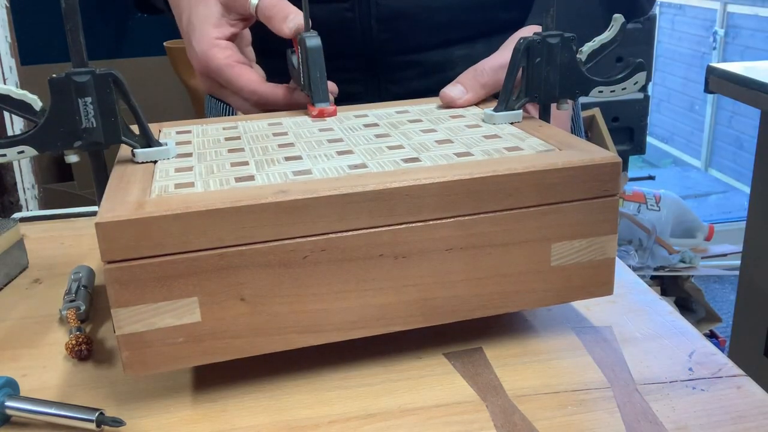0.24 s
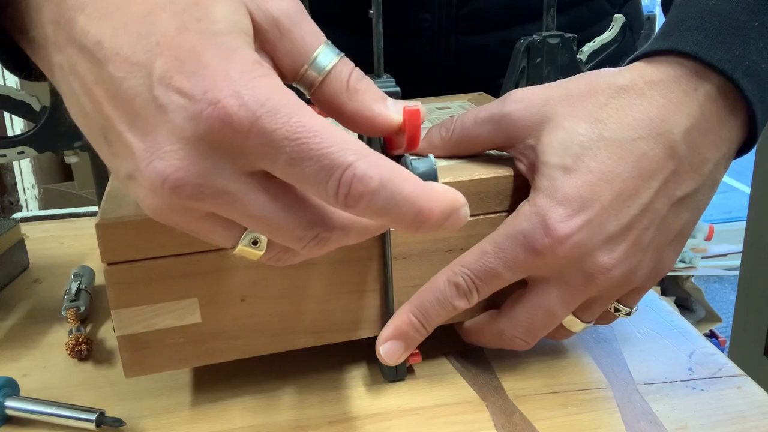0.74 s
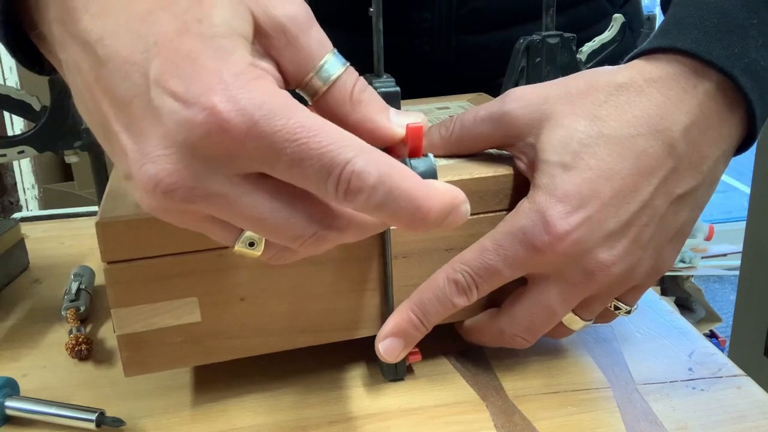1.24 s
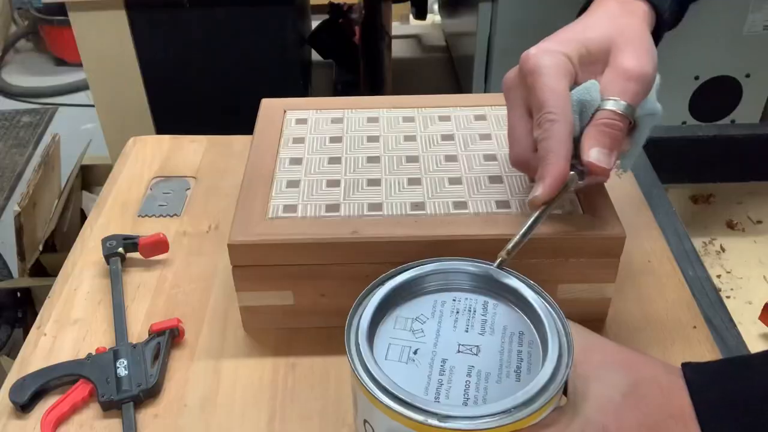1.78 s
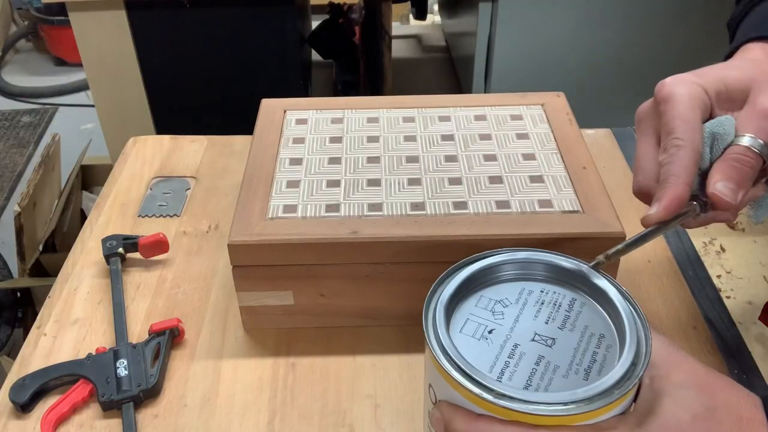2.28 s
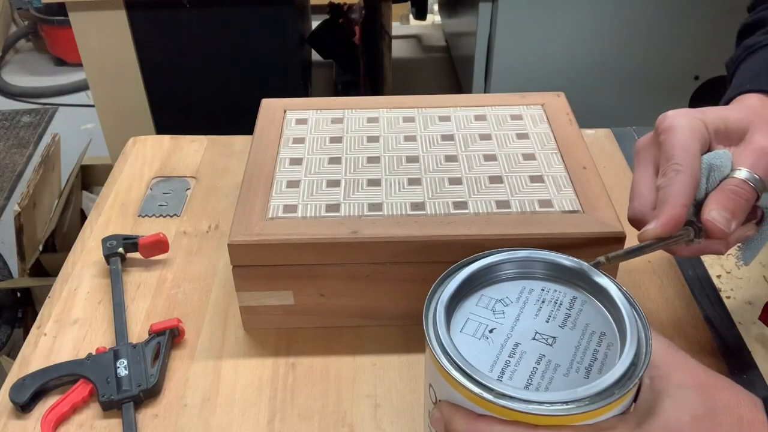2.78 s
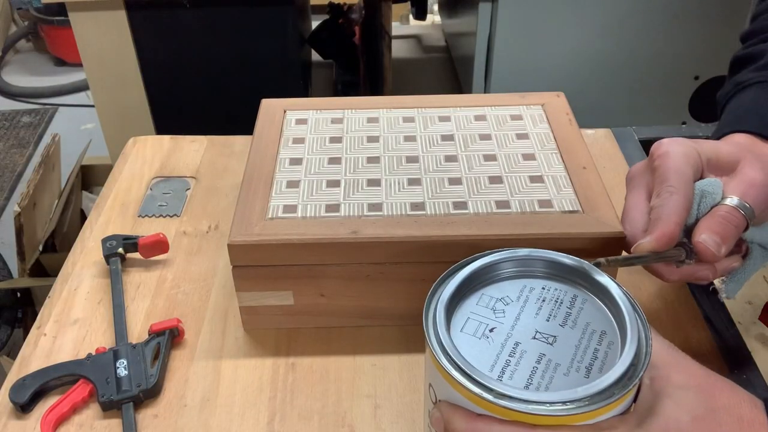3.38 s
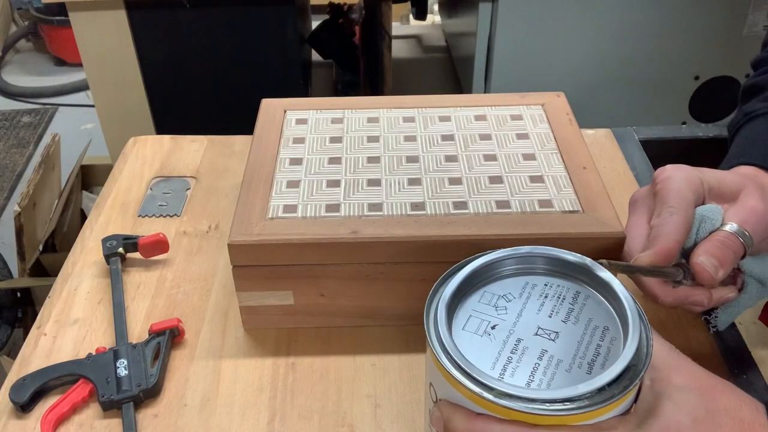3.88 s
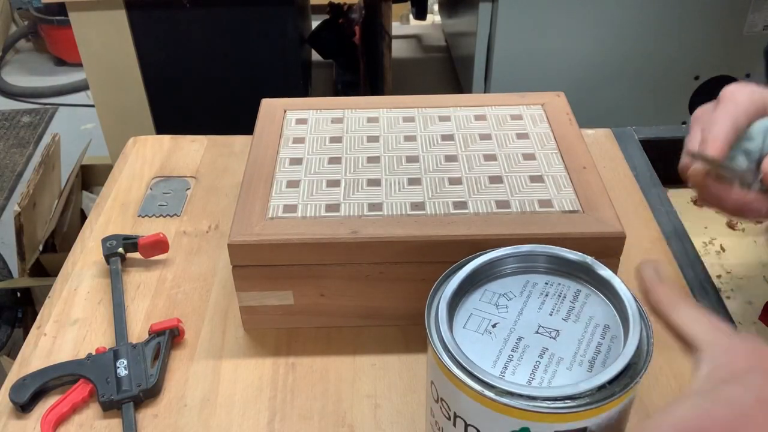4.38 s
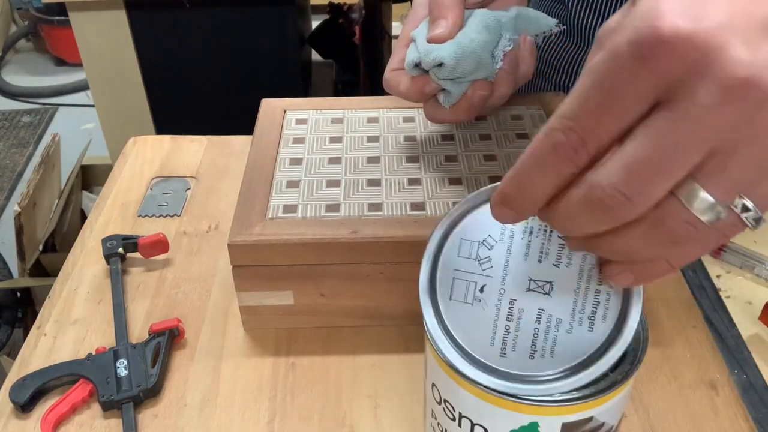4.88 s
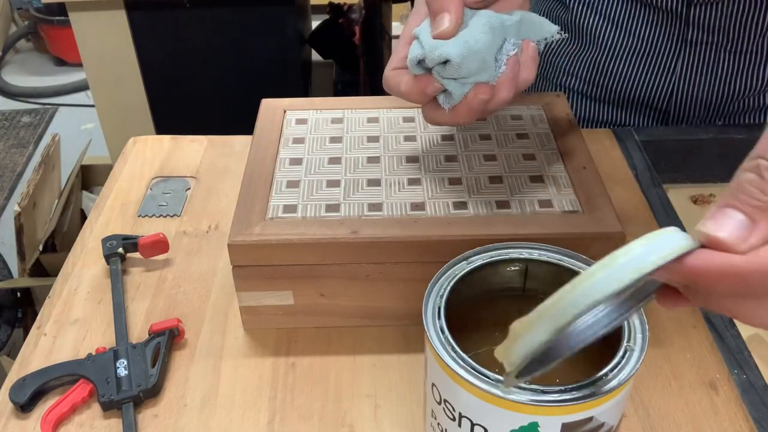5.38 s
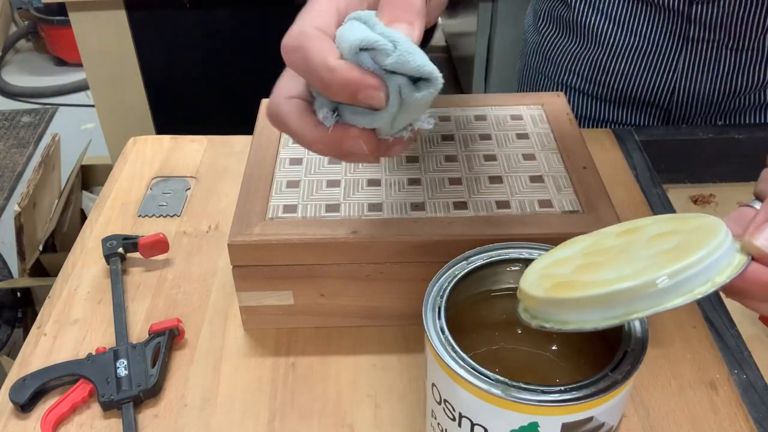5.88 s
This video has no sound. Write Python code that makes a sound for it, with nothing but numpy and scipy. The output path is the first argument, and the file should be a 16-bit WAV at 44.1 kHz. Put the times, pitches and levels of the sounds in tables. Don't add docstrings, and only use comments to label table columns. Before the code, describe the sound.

Soft hollow wooden box knocks and rubs in a quiet workshop, then a fan hiss begins and a tin lid is levered up in five loud ringing pops.

```python
import sys
import numpy as np
from scipy import signal
from scipy.fft import rfft, irfft
from scipy.io import wavfile
from scipy.ndimage import uniform_filter1d

SR = 44100
rng = np.random.default_rng(int(sys.argv[2]) if len(sys.argv) > 2 else 0)


def pcm_store(signal):
    levels = np.round(np.clip(np.atleast_2d(signal), -1, 1) * 32767)
    wavfile.write(sys.argv[1], SR, levels.astype(np.int16).T)


def to_linear_factor(level_db):
    exponent = np.asarray(level_db, float) / 20
    return 10 ** exponent


N = 270333
T = np.arange(N) / SR
HZ = np.maximum(np.fft.rfftfreq(N, 1 / SR), 1)

CHANGES_S = (1.781, 4.577)
# start in seconds, peak in dB, lid ring in Hz, lid body in dB, bench thud in dB.
LID_POPS = [
    (2.2178, -3.5, 700.3, -13.5, -13),
    (2.6583, -8, 709.5, -7.5, -3),
    (2.948, -7.5, 731, -11.5, -15),
    (3.25, -6.5, 730, -29, -7.5),
    (3.481, -4, 723.5, -14.5, -6.5),
]


def on_hz(table):
    hz, value = np.transpose(table)
    return np.interp(np.log(HZ), np.log(np.maximum(hz, 1)), value)


def on_time(table):
    return np.interp(T, *np.transpose(table))


def unit(x):
    return x / np.sqrt(np.mean(x ** 2))


def band(x, lo_hz, hi_hz):
    return signal.sosfilt(signal.butter(2, [lo_hz, min(hi_hz, 20000)], "band", fs=SR, output="sos"), x)


def walk(rate):
    k = int(SR / rate)
    steps = np.repeat(rng.standard_normal(N // k + 1), k)
    return 1.82 * uniform_filter1d(uniform_filter1d(steps, k), k)[:N]


def add(out, s, x):
    i = int(s * SR)
    out[i:i + len(x)] += x[:N - i]


def ring(modes, db, scale=1., push_ms=.3, scatter_db=2.5, split=0.0038, jitter=0.0083, sag=0.):
    hz, mode_db, t60 = np.array(modes).T[:, :, None]
    chance = rng.standard_normal((3, len(modes), 1))
    t = T[:SR // 2]
    sag_ms = 5.7
    settled_s = t - sag * sag_ms / 1000 * np.expm1(-t * 1000 / sag_ms)
    turn = 2 * np.pi * hz * scale * (1 + jitter * chance[0]) * settled_s
    pair = np.sin(turn) + np.sin(turn * (1 + split * chance[2]))
    waves = pair * np.exp(-np.log(1000) * t / t60)
    x = np.sum(to_linear_factor(mode_db + scatter_db * chance[1]) * waves, axis=0)
    x = x * -np.expm1(-t * 1000 / push_ms)
    return to_linear_factor(db) * x / np.abs(x).max()


def crack(db, lo_hz, hi_hz, ms):
    t = T[:SR // 4]
    x = band(rng.standard_normal(len(t)) * np.exp(-t * 1000 / ms), lo_hz, hi_hz)
    return to_linear_factor(db) * x / np.abs(x).max()


def stroke(t, peak_s, rise_s, fall_s):
    away = np.where(t < peak_s, (peak_s - t) / rise_s, (t - peak_s) / fall_s)
    return -29.5 * away ** 1.11


def air(spectrum, db, flicker_db):
    # frequency in Hz, left-right correlation.
    likeness = [(60, 0.8), (130, 0.52), (290, -0.021), (640, -0.5), (1410, -0.15), (3100, 0.28),
                (6820, -0.44), (15000, 0.28)]
    like = np.clip(on_hz(likeness), -.95, .95)
    noise = rfft(rng.standard_normal((2, N)))
    mid, side = noise * to_linear_factor(on_hz(spectrum)) * np.sqrt([1 + like, 1 - like])
    out = 0
    for octave in range(4, 15):
        share = np.clip(1 - np.abs(np.log2(HZ) - octave), 0, 1)
        flicker = to_linear_factor(flicker_db * min(8 / octave, 1) ** 4 * walk(14))
        out = out + flicker * irfft(share * np.array([mid + side, mid - side]), N)
    return to_linear_factor(db) * out / np.sqrt(np.mean(out.mean(axis=0) ** 2))


def quiet_room():
    # frequency in Hz, level in dB per Hz.
    spectrum = [(15, -35), (25, 6.5), (313, -11), (648, -18.5), (970, -20.5), (1410, -18.5), (1530, -26),
                (3630, -25.5), (7300, -27.5), (8130, -25), (9550, -26.5), (12200, -25), (15500, -32)]
    return air(spectrum, -75.6, flicker_db=3.0) * (T < CHANGES_S[0])


def rubs():
    scrapes = {"palm": [(.108, 0.08, 0.041, -71, -93), (.178, 0.16, 0.11, -72, -75),
               (.794, .03, 0.052, -78.5, -78)], "box": [(1.385, 0.03, 0.027, -61.5, -76),
               (1.445, 0.039, 0.16, -64.5, -67), (1.6, 0.19, 0.29, -74, -71),
               (1.76, 0.19, 0.042, -72, -75)], "tin": [(1.9, 0.115, .12, -68, -66.5),
               (1.96, 0.071, .16, -64.5, -65), (2.03, 0.056, 0.086, -70.5, -74)],
               "blade": [(3.672, 0.0081, 0.087, -73, -64), (3.74, 0.022, 0.11, -60.5, -48.5),
               (3.782, 0.09, 0.026, -46, -35.5), (3.83, .05, 0.061, -75, -78)],
               "rim": [(4.2, .02, 0.11, -74, -80), (4.27, .02, .04, -66, -71),
               (4.288, 0.059, 0.047, -66, -56.5), (4.62, 0.022, 0.016, -54.5, -74),
               (4.64, 0.022, 0.056, -64.5, -67.5)], "lid": [(5.04, 0.1, 0.23, -67, -87),
               (5.1, 0.044, .08, -83, -90)]}
    drags = {"palm": [(.005, 0.0089, 0.07, -55, -76), (.12, 0.12, 0.07, -62, -58),
             (.17, 0.14, 0.032, -49, -73), (.3, 0.17, 0.023, -68, -81)],
             "box": [(1.45, 0.054, 0.063, -45, -49.5), (1.505, 0.052, 0.048, -45.5, -71.5)],
             "tin": [(1.92, 0.14, 0.36, -33.5, -45.5), (2.02, 0.17, 0.15, -40.5, -55.5)],
             "blade": [(3.75, 0.048, 0.085, -73, -41.5), (3.79, 0.07, 0.043, -36, -44),
             (3.87, 0.096, 0.066, -51.5, -70)], "rim": [(4.204, 0.0086, 0.05, -70, -44.5),
             (4.288, 0.087, 0.33, -54, -57.5), (4.62, 0.016, 0.013, -70, -61.5)],
             "lid": [(5.03, 0.034, 0.44, -68, -53)]}
    scrape_tones = {"palm": (3140, 1.3, 12300, 0.93), "box": (3350, 1.3, 9800, 0.6),
                    "tin": (2800, 1.1, 14160, .15), "blade": (3430, 5.7, 11500, 3.2),
                    "rim": (3960, 1.7, 13000, 1.9), "lid": (4600, 0.39, 12200, .6)}
    drag_tones = {"palm": (99, 1570, 0), "box": (140, 340, 0), "tin": (87.8, 1830, 1.6),
                  "blade": (237, 2240, 0), "rim": (199, 1770, 0), "lid": (150, 1000, 0)}
    slide_hz = (713, 1043, 1274, 1562)
    out = np.zeros(N)
    grain = rng.standard_normal((2, N)) * to_linear_factor(1.2 * walk(150))
    slips = rng.standard_normal(N) * to_linear_factor(2.5 * walk(45))
    for name, (rasp_hz, rasp_broad, hiss_hz, hiss_broad) in scrape_tones.items():
        rumble_hz, body_hz, sing = drag_tones[name]
        times = [row[0] for row in scrapes[name] + drags[name]]
        now = slice(int(max(min(times) - .3, 0) * SR), int((max(times) + .4) * SR))
        coarse, fine, slip = grain[0, now], grain[1, now], slips[now]
        rasp = band(coarse, rasp_hz * 0.977, rasp_hz * 1.1) + rasp_broad * band(coarse, 1400, 5900)
        hiss = band(fine, hiss_hz * 0.87, hiss_hz) + hiss_broad * band(fine, 6300, 20300)
        rumble = band(slip, rumble_hz * 0.978, rumble_hz * 1.25)
        rumble = rumble + 0.66 * band(slip, rumble_hz * 1.6, rumble_hz * 2.0)
        walls = sum(band(coarse, hz * .96, hz * 1.04) for hz in slide_hz)
        body = band(coarse, body_hz * 0.12, body_hz * 1.15) + sing * walls
        for *shape, rasp_db, hiss_db in scrapes[name]:
            friction = to_linear_factor(rasp_db) * unit(rasp) + to_linear_factor(hiss_db - 0.5) * unit(hiss)
            out[now] += to_linear_factor(stroke(T[now], *shape)) * friction
        for *shape, rumble_db, body_db in drags[name]:
            shaking = to_linear_factor(rumble_db - 6.0) * unit(rumble) + to_linear_factor(body_db - 4.0) * unit(body)
            out[now] += to_linear_factor(stroke(T[now], *shape)) * shaking
    return out


def knocks():
    # start in seconds, peak in dB, body in Hz, side panel in dB, hardness in dB.
    blows = [(0.036, -54.5, 183, -10, -28), (0.09, -60, 290, 8.5, -16), (0.105, -51.5, 243, 9, -17),
             (0.136, -61, 105, -3, -14), (0.333, -51, 314, 9, -25), (0.34, -36.5, 184.6, -31, -14),
             (0.498, -45.5, 211, -24, -22), (0.6, -43, 175.6, -32, -50), (0.629, -59, 152, -22, -41),
             (0.749, -63, 177, -21, -24), (0.786, -57, 207, -15, -9), (1.065, -44.5, 190, -19.5, -39),
             (1.217, -55.5, 300, -29, -29), (1.331, -62.5, 198, -15, -23), (1.385, -26, 197, -4.5, -14.5),
             (1.42, -39.5, 152, -19, -37), (3.765, -33.5, 189, -3.5, -7), (0.372, -48, 150, -11, -23),
             (1.46, -48, 158, -4.5, -30), (3.797, -38, 169.4, -6.5, -6), (3.821, -46, 150, -3, -25)]
    # ratio to body pitch, level in dB, t60 in seconds.
    box = [(.6, -7.5, 0.11), (1.0, 6, 0.07), (1.4, -7, 0.069)]
    # frequency in Hz, level in dB, t60 in seconds.
    panel = [(334.6, -0.5, 0.13), (356.7, 8, 0.086), (424.3, -3, 0.14), (432.5, -10.5, 0.18)]
    wood = [(550, -2, .05), (673, 0, .07), (760, -3, .05), (926, -4, .035), (1200, -4, .025),
            (1400, -5, .025), (1700, -8, .02), (2480, -12, .015)]
    out = np.zeros(N)
    for s, db, body_hz, panel_db, hard_db in blows:
        add(out, s, ring(box, db + 0.089, body_hz, push_ms=25.0, split=0.034, scatter_db=1.0, sag=0.54))
        add(out, s, ring(panel, db + panel_db, push_ms=7.6, split=0.051, scatter_db=2.5))
        add(out, s + 0.0093, crack(db - 11.5, body_hz * 0.546, body_hz * 1.05, ms=38.0))
        add(out, s + 0.011, crack(db - 17.0, 55, 125, ms=52.0))
        add(out, s - .002, ring(wood, db + hard_db - .1, push_ms=3.0, scatter_db=3.0, split=0.04))
        add(out, s - .002, crack(db + hard_db - 12.5, 950, 3360, ms=19.0))
    return out


def ticks():
    # start in seconds, peak in dB, pitch in Hz, low part in dB, top part in dB.
    small_ticks = [(0.0836, -48.5, 5540, 0.5, -18), (0.1045, -38.5, 5270, -9.5, -21),
                   (0.3294, -51, 3450, 5, -13), (0.4797, -74.5, 3580, 9.5, -10),
                   (0.8003, -65, 3380, -17, -2), (0.9038, -68.5, 3470, -10, 2),
                   (1.3805, -49.5, 3940, 9.5, -10), (1.4424, -43.5, 4770, -15, -31),
                   (3.579, -52, 3200, 12, -20.5), (3.6708, -49, 6800, -10, -4), (3.726, -42, 6000, -6, 0),
                   (3.7485, -38, 3540, -4, 2), (4.2055, -44, 4900, 4, -2.5), (4.2244, -48, 5150, 2, -12),
                   (4.2617, -52, 4270, 1, 2), (4.2768, -48.5, 3360, -0.5, 3), (4.589, -54, 5140, -7, -8.5),
                   (4.5974, -58.5, 3470, -17, -5), (4.6187, -40.5, 5070, -1, 2.5)]
    # start in seconds, peak in dB, pitch in Hz.
    lid_ticks = [(4.8427, -58, 5120), (5.1647, -64, 4900), (5.5253, -75, 5180), (5.5653, -65, 5030)]
    out = np.zeros(N)
    for s, db, tick_hz, low_db, top_db in small_ticks:
        add(out, s, crack(db - 9.0, tick_hz * .96, tick_hz * 1.04, ms=2.2))
        add(out, s, crack(db - 8.5, 3200, 7600, ms=2.7))
        add(out, s, crack(db + low_db - 1, 600, 2000, ms=3.4))
        add(out, s, crack(db + top_db + 0.12, 7700, 15800, ms=2.1))
    for s, db, tick_hz in lid_ticks:
        add(out, s, crack(db - 3, tick_hz * .97, tick_hz * 1.03, ms=4.1))
        add(out, s, crack(db - 2, 3000, 6300, ms=2.4))
    return out


def fan():
    # frequency in Hz, level in dB per Hz.
    spectrum = [(15, -79), (25, -18), (91, -17), (160, -14.5), (188, -21), (240, -16), (389, -8.5),
                (445, -7.5), (582, -5.5), (1850, -17), (3630, -28), (7100, -48), (7910, -50.5),
                (14200, -48), (15000, -70)]
    # frequency in Hz, width in Hz, level in dB.
    resonances = [(197, 16.02, -71), (330.6, 69, -73), (1101.5, 110, -71), (1822, 160, -77.5)]
    # time in seconds, swell in dB.
    swells = [(1.78, 4), (2.2, 4), (4.4, 4.5), (4.6, 3), (6.13, 2.5)]
    # time in seconds, level in dB.
    hum_level = [(3.9, -77.5), (4.7, -76), (4.77, -67.5), (6.13, -65.5)]
    # peak in seconds, level in dB.
    surges = [(4.24, -52), (4.79, -52.5), (4.91, -55.5), (5.07, -55), (5.2, -58.5), (5.47, -55.5),
              (5.82, -56.5), (6.12, -59)]
    duct = 0
    for hz, width_hz, db in resonances:
        flutter = to_linear_factor(db + 2.4 * walk(9))
        duct = duct + flutter * unit(band(rng.standard_normal(N), hz - width_hz / 2, hz + width_hz / 2))
    gusts = sum(to_linear_factor(db + stroke(T, s, 0.072, 0.073)) for s, db in surges)
    hum = (to_linear_factor(on_time(hum_level)) + gusts) * unit(band(rng.standard_normal(N), 425, 468))
    hum = hum * to_linear_factor(-walk(20))
    fade_in = np.clip((T - CHANGES_S[0]) / .003, 0, 1)
    dip = np.clip(np.abs(T - CHANGES_S[1]) / 0.0034, .1, 1)
    hiss = air(spectrum, -60.5, flicker_db=2.5)
    return ((hiss + duct) * to_linear_factor(on_time(swells)) + hum) * fade_in * dip


def gripped(modes, low_db, high_db):
    grip_hz = (400, 1030, 3000, 3800)
    grip_db = (low_db, 0, 0, high_db)
    return [(hz, db + np.interp(hz, grip_hz, grip_db), t60) for hz, db, t60 in modes]


def pops():
    blade = [(-17, -7.5, -15, 5.5, -20.5), (-18.5, -24, -14.5, -10, -30), (-37.5, -36, 7, 0, -34.5),
             (-17.5, -23.5, -4, 1, -37.5), (-13.5, -26, 12, 3, -23)]
    # frequency in Hz, level in dB, t60 in seconds; rim, bench and boom alike.
    tin_modes = [(914, -6.5, 0.035), (1025, 1, 0.042), (1282, -9.5, 0.085), (1376, 2, 0.0158),
                 (1340, 2, 0.039), (1533, -12.5, 0.017), (1630, -9, 0.0693), (1530, -1, 0.013),
                 (2170, -52, .08)]
    rim_modes = [(2260, -1, .03), (2790, -2, .022), (3063, -2, .028), (3760, -4, .035), (4200, -8, .02),
                 (4900, -11, .015)]
    bench_modes = [(205.8, -24, 0.15), (253, -13.5, 0.059), (302, -12, 0.042), (361, -5.5, 0.035),
                   (432.4, -20, 0.063)]
    boom_modes = [(95, -6.5, 0.35), (174, 2.5, 0.27)]
    # ratio to lid ring, level in dB, t60 in seconds; the lid's long ring alike.
    lid_modes = [(.74, -7.5, 0.072), (.82, 0, 0.044), (.92, 4, 0.051), (1.0, 7, 0.046)]
    lid_ring = [(.955, -15.5, 0.3), (.99, -16, .7), (1.02, -9.5, 0.53), (1.42, -14.5, .2), (1.82, -18, .2),
                (1.93, -15.5, 0.16), (2.3, -14.5, 0.17), (2.65, -19.5, 0.19)]
    # frequency in Hz, level in dB, fall in ms.
    rattle = [(300, -3, 50), (730, 5, 32), (1549, -2, 11), (2270, -21.5, 25), (4830, -31, 20.5)]
    out = np.zeros(N)
    damped = np.exp(-np.maximum(T[:SR // 2] - 0.15, 0) / 0.025)
    for (s, db, lid_hz, lid_db, bench_db), (rim_db, blade_db, low_db, high_db, ring_db) in zip(LID_POPS, blade):
        creak = crack(db - 25, 500, 2500, ms=5.)[:int(.012 * SR)]
        add(out, s - .012, creak[::-1])
        s = s + .0008
        tin, rim, bench = [gripped(modes, low_db, high_db) for modes in (tin_modes, rim_modes, bench_modes)]
        add(out, s, -ring(tin, db - 0.5, push_ms=0.28, scatter_db=3.5))
        add(out, s, ring(lid_modes, db + lid_db + 0.11, lid_hz, push_ms=3.8, scatter_db=5.0))
        long_ring = ring(lid_ring, ring_db - 7.5, lid_hz, push_ms=18.0, split=0.022, scatter_db=4.0)
        add(out, s, damped * long_ring)
        add(out, s + 0.0011, ring(bench, db + bench_db + 0.11, push_ms=1.76, split=0.079, scatter_db=0.5))
        add(out, s + 0.0001, ring(boom_modes, db + bench_db - 16, push_ms=9.9, split=0.083, scatter_db=1.0))
        add(out, s, ring(rim, db + rim_db - 3.5, push_ms=.15, scatter_db=2.0, split=.03))
        add(out, s, crack(db + rim_db - 5.5, 3900, 7300, ms=0.83))
        add(out, s, crack(db + blade_db + 0.12, 9600, 13130, ms=0.89))
        add(out, s + 0.0055, crack(db + blade_db - 26, 8770, 14800, ms=24.0))
        for hz, part_db, ms in rattle:
            add(out, s + .004, crack(db - 28 + part_db, hz / 1.87, hz * 1.06, ms))
    return out


def ringing_on():
    # lid tone in Hz, its dB, partner in Hz, its dB, seconds until a hand damps them.
    tones = [(697, -32.5, 668, -43.5, 0.077), (721, -33, 660, -33, 0.13), (731, -37, 1600, -36.5, .135),
             (731, -48, 770, -51, 0.12), (730, -34, 708, -39, .13)]
    # wall tone in Hz, its dB, rim tone in Hz, its dB.
    seat = [(985, -35, 2998, -43.5), (1050, -39.5, 2000, -44), (1015, -29.5, 3031, -41),
            (887, -26, 2600, -46), (880, -26.5, 3068, -41)]
    # frequency in Hz, level in dB, t60 in seconds.
    can = [(238, -3, .12), (419, -6.5, 0.24), (542, 2, 0.25), (1057, -4, .15), (1378, 0, .2),
           (1490, -6.5, .17), (1665, -6.5, 0.31), (1750, -2.5, 0.11), (2065, -1.5, 0.072),
           (2150, -25.5, 0.083), (2490, -12.5, 0.25), (3820, -17, 0.063)]
    grit = (-25, -24.5, -28, -27, -26)
    out = np.zeros(N)
    clean = dict(scatter_db=0, split=0, jitter=0)
    for (s, db, *_), tone, (wall_hz, wall_db, rim_hz, rim_db), grit_db in zip(LID_POPS, tones, seat, grit):
        lid_hz, lid_db, partner_hz, partner_db, hold_s = tone
        damped = np.exp(-np.maximum(T[:SR // 2] - hold_s, 0) / 0.0073)
        add(out, s, damped * ring([(lid_hz, 0, .5)], lid_db, push_ms=6., **clean))
        add(out, s, damped * ring([(partner_hz, 0, .25)], partner_db, push_ms=6., **clean))
        add(out, s, ring([(wall_hz, 0, 0.11)], wall_db, push_ms=1.2, **clean))
        add(out, s, ring([(rim_hz, 0, .09)], rim_db, push_ms=1.4, **clean))
        buzz = crack(lid_db - 2.5, lid_hz * .9, lid_hz * 1.08, ms=77.0)
        add(out, s + 0.00393, damped[:SR // 4] * buzz)
        add(out, s + .002, crack(db + grit_db, 1500, 2600, ms=25.0))
        add(out, s + 0.001015, crack(db + grit_db - 9, 2600, 5200, ms=8.9))
        add(out, s, ring(can, db - 19.5, push_ms=2.5, scatter_db=2.5, split=0.0059, jitter=0.0022))
    return out


def ports(x):
    # frequency in Hz, left minus right in dB.
    port_db = [(60, 2), (110, -7.5), (200, -6), (380, -7.5), (700, 0.5), (1290, 3), (2380, 3), (4400, 0.5),
               (8120, 0), (15000, -0.5)]
    # frequency in Hz, lead of left in radians.
    port_lead = [(60, -.2), (400, -.4), (760, 1.6), (1030, .3), (2700, .5), (3500, 1.3), (5000, 2.0),
                 (8500, 1.9), (11000, .9), (15000, 1.1)]
    half = to_linear_factor(on_hz(port_db) / 2) * np.exp(.5j * on_hz(port_lead))
    pair = np.array([half, 1 / half])
    return irfft(rfft(x) * pair / np.maximum(np.abs(pair.mean(axis=0)), .7), N)


def room(x):
    # frequency in Hz, t60 in seconds, level in dB.
    decays = [(100, .4, -14), (300, .35, -13), (900, .33, -13), (2500, .3, -12), (5500, .25, -14),
              (12000, .2, -20)]
    t = T[:SR // 2]
    tail = 0
    for hz, t60, db in decays:
        noise = band(rng.standard_normal((2, len(t))), hz / 1.76, hz * 1.82)
        dying = unit(noise * np.exp(-np.log(1000) * t / t60))
        tail = tail + to_linear_factor(db) * dying * np.sqrt(hz / SR / len(t))
    return signal.fftconvolve(x[None], tail * -np.expm1(-t / 0.0032), axes=1)[:, :N]


def scene():
    near = rubs() + knocks() + ticks() + pops() + ringing_on()
    fan_sides = to_linear_factor(np.array([[-0.25], [0.25]]))
    far = quiet_room() + fan() * fan_sides
    return ports(near) + to_linear_factor(4.5) * room(near) + far


def band_limit(x):
    return signal.sosfilt(signal.butter(12, 16810, fs=SR, output="sos"), x)


def record(dry):
    # frequency in Hz, level in dB.
    response = [(20, -20), (45, -5), (80, 0), (7200, 0), (7600, -10), (9300, -10), (9600, 0), (14600, 0),
                (15300, -8), (16000, -16), (16700, -35)]
    held = 1.15 * np.tanh(dry / 1.15)
    mix = irfft(rfft(held) * to_linear_factor(on_hz(response)), N)
    return band_limit(mix)


dry = scene()
out = record(dry)
pcm_store(out)
```